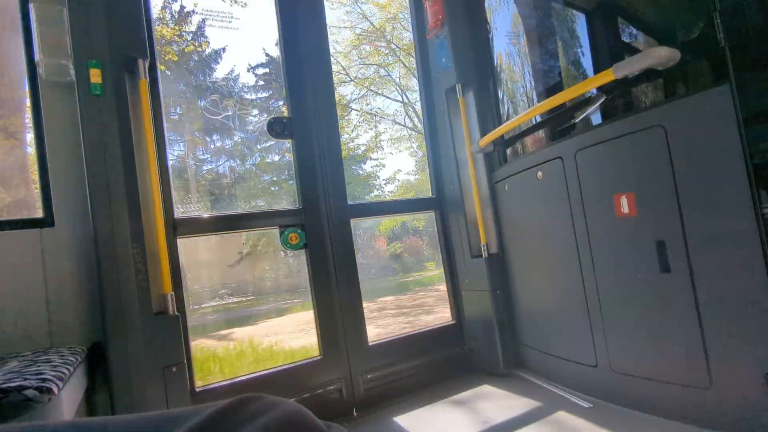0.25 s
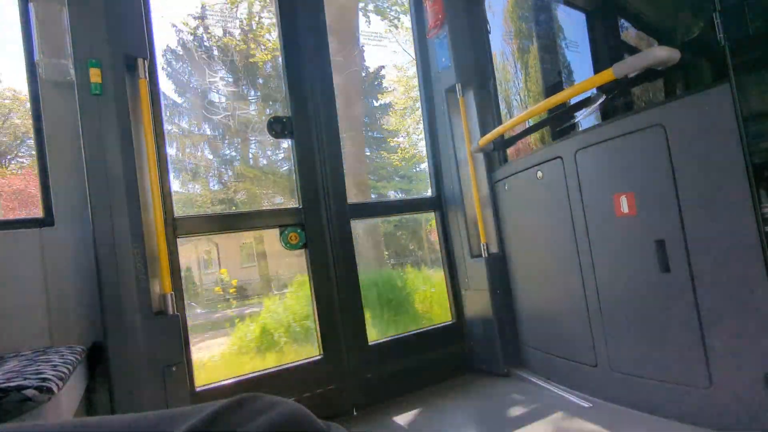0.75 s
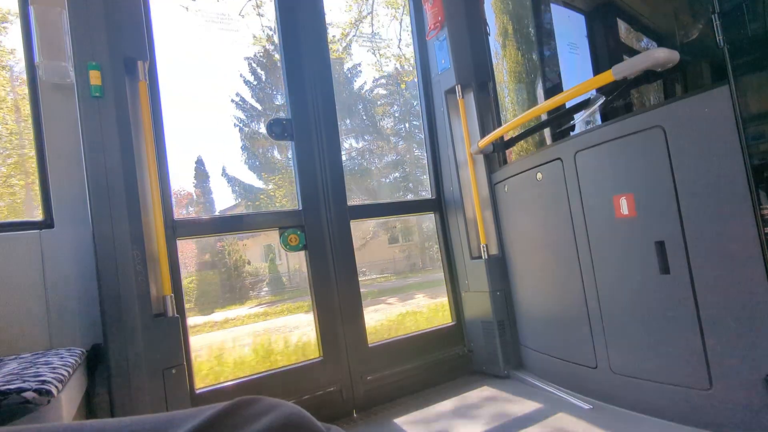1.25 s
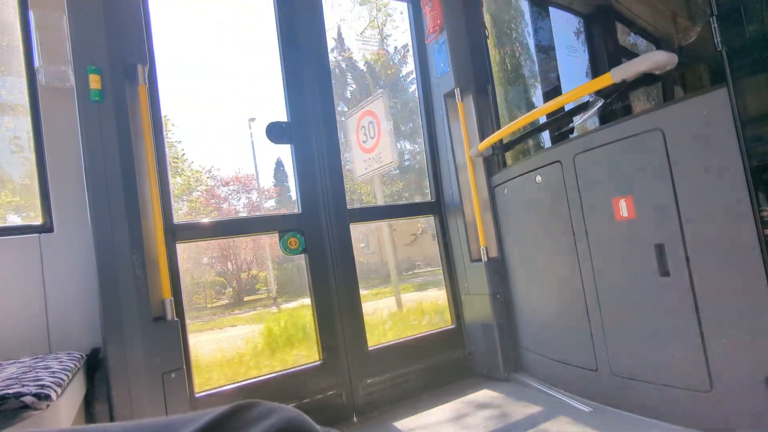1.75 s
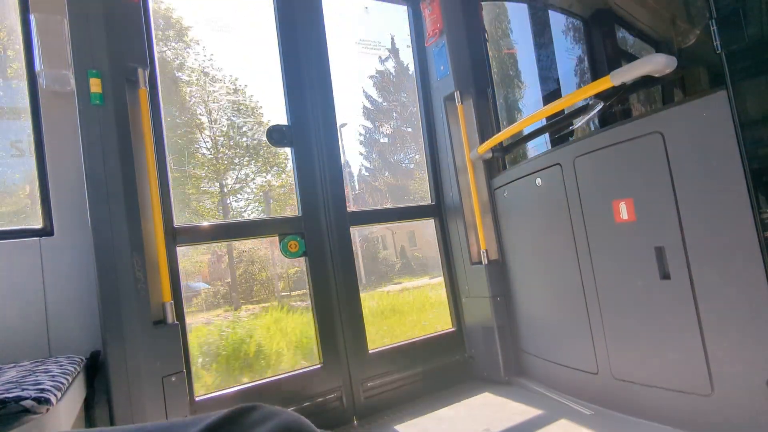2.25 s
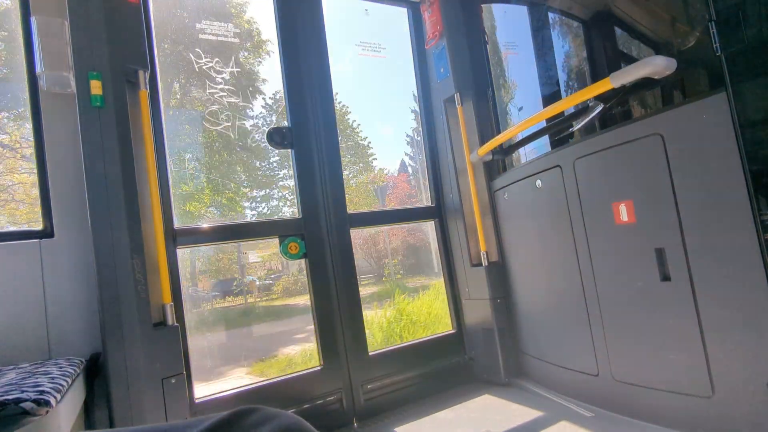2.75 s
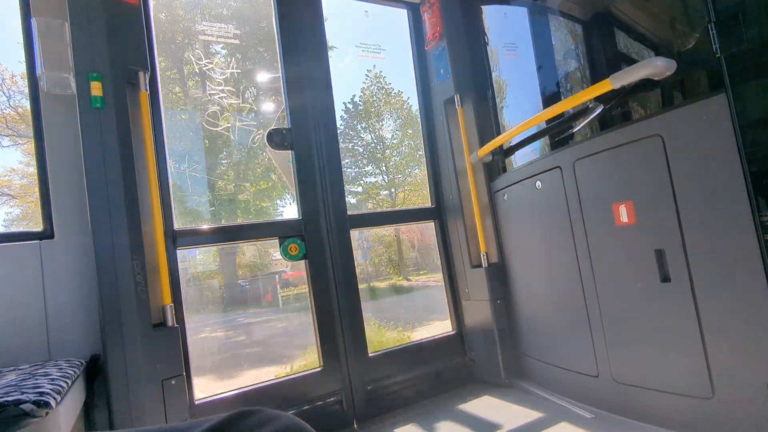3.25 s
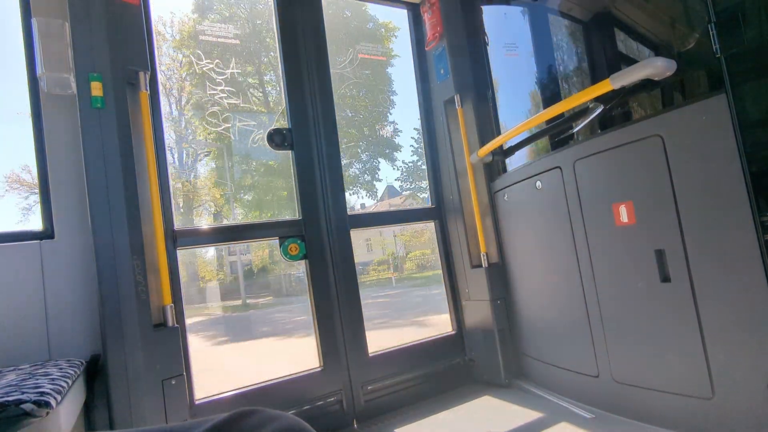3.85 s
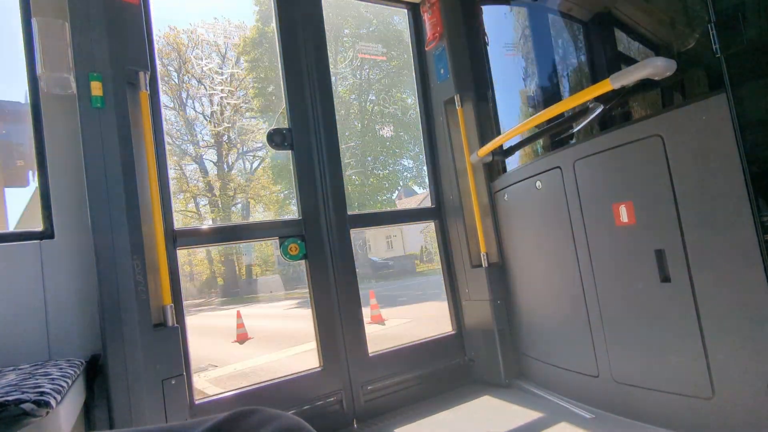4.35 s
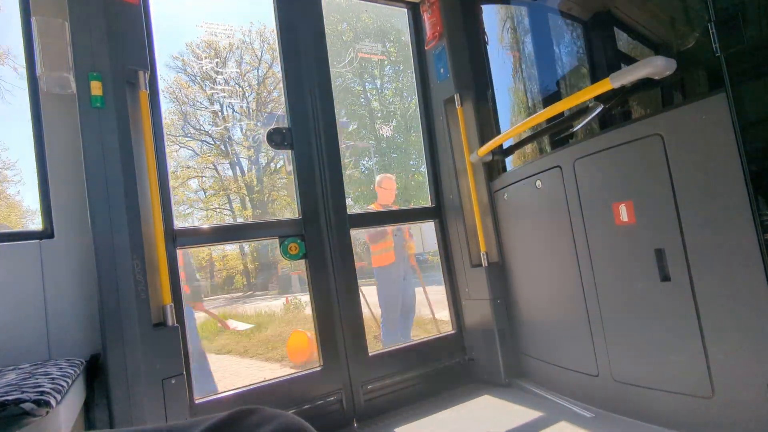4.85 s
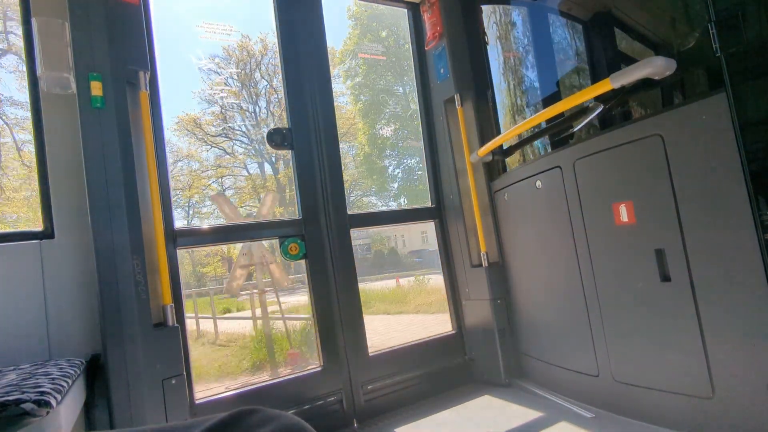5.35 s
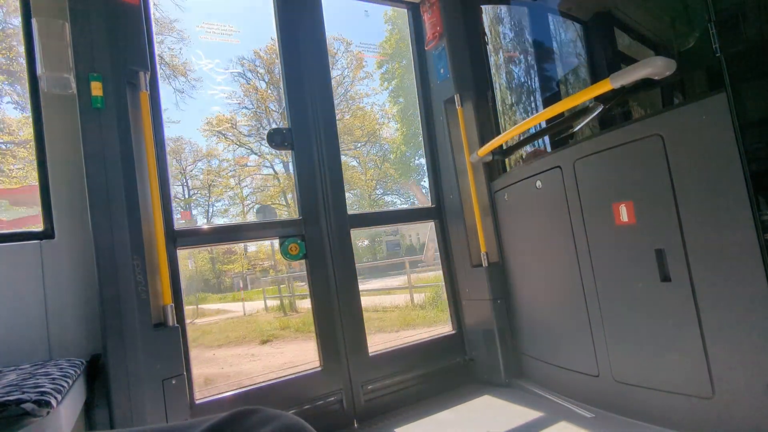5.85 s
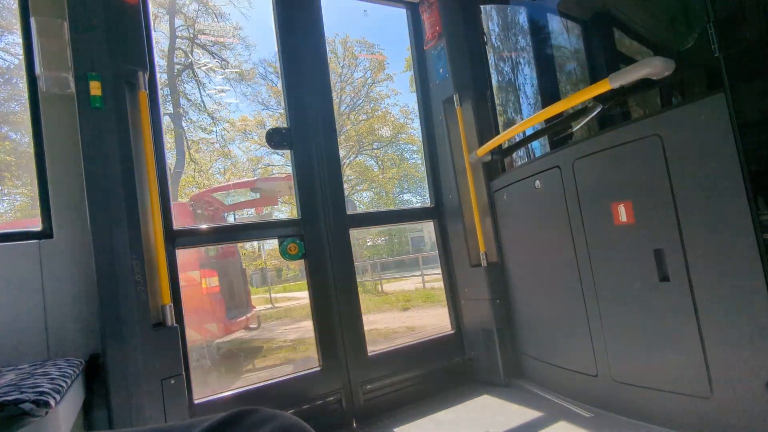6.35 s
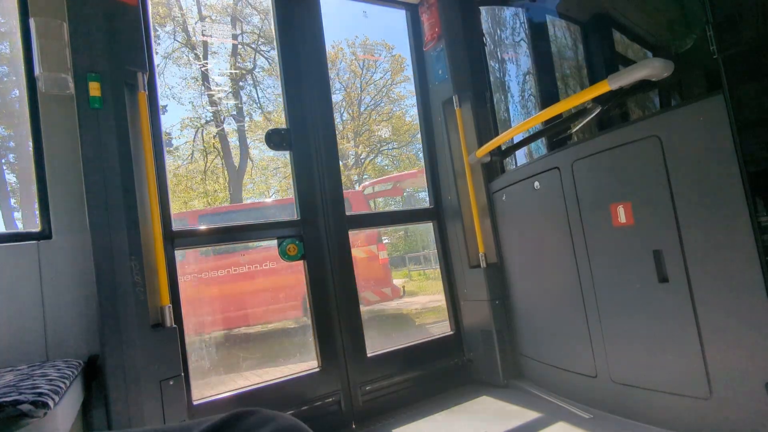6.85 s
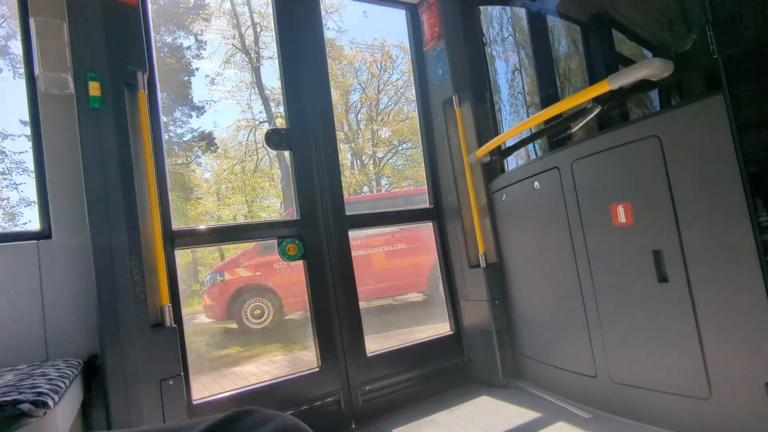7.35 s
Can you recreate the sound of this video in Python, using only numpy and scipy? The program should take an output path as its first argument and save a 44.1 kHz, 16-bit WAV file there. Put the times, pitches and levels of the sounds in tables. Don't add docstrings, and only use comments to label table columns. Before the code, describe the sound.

From a passenger seat near the doors of a braking tram, heard in close stereo. Quiet rolling, vent hiss and a faint steady gear whine open it. Then the wheels reach a hard crossing: deep floor thuds, panel bangs and sharp rattles of loose door fittings come irregularly. The roughness fades, leaving a gear whine sliding down in pitch, tiny brake squeaks and a few last thumps with a sharp knock.

```python
import sys
import numpy as np
from scipy import signal
from scipy.fft import rfft, irfft, next_fast_len
from scipy.io import wavfile
from scipy.ndimage import uniform_filter1d

SR = 44100
rng = np.random.default_rng(int(sys.argv[2]) if len(sys.argv) > 2 else 0)


def transcribe(signal):
    frames = np.atleast_2d(signal).T
    limited = np.clip(frames, -1, 1)
    pcm = np.round(limited * 32767).astype(np.int16)
    wavfile.write(sys.argv[1], SR, pcm)


def boost_factor(decibels):
    exponent = np.asarray(decibels, float) / 20
    return 10 ** exponent


N = 334719
TIME, SIZE = np.arange(N) / SR, next_fast_len(N + SR)
FREQ = np.arange(1, SIZE // 2 + 2) * SR / SIZE


def level(x, db):
    return x * boost_factor(db) / np.sqrt(np.mean(x ** 2))


def curves(table):
    s, *columns = np.transpose(table)
    return [np.interp(TIME, s, column) for column in columns]


def over_hz(table):
    hz, value = np.transpose(table)
    return np.interp(np.log(FREQ), np.log(hz), value)


def ring(x, modes, order=1):
    body = 0
    for k, (hz, width, db) in enumerate(modes):
        detuning = (FREQ / hz - hz / FREQ) * hz / width
        body = body + (-1) ** k * boost_factor(db) / (1 + 1j * detuning) ** order
    body = body / np.sqrt(np.mean(np.abs(body) ** 2))
    return irfft(rfft(x, SIZE) * body, SIZE)[..., :N]


# f/Hz, share [0-1]
LIKENESS = [(30, 0.9), (120, 0.98), (300, 0.94), (600, 0.56), (1200, 0.32), (4000, 0), (8000, 0.04),
            (15000, 0.2)]
# f/Hz, phase [radians]
LEFT_LEAD = [(30, 0.8), (100, -0.62), (300, -0.4), (520, -0.77), (700, 1.1), (1120, -4), (1640, -1),
             (2200, -7), (2930, 1.5), (4130, -4), (6200, -24.5), (15000, -18.5)]


def ports(common, own):
    share = np.clip(over_hz(LIKENESS), 0, 1)
    turn = np.exp(np.array([[.5j], [-.5j]]) * over_hz(LEFT_LEAD))
    shared_part = np.sqrt(share) * turn * rfft(common, SIZE)
    own_part = np.sqrt(1 - share) * rfft(own, SIZE)
    return irfft(shared_part + own_part, SIZE)[:, :N]


def noise(envelope=1):
    white = envelope * rng.standard_normal((3, N))
    return ports(white[0], white[1:])


def walk(rate_hz):
    hold = int(SR / rate_hz)
    steps = np.repeat(rng.standard_normal(N // 100), hold)[:N]
    return 1.04 * uniform_filter1d(uniform_filter1d(steps, hold), hold)


def bursts(times, peak_db, t60, rise_s):
    out, age = np.zeros(N + SR), np.arange(SR) / SR
    for s, db in zip(times, peak_db):
        start = int(s * SR)
        out[start:start + SR] += boost_factor(db - 60 * age / t60) * (1 - np.exp(-age / rise_s))
    return out[:N]


def tone(hz, db, wobble_db, apart=1., waver_hz=0.):
    phase = 2 * np.pi * np.cumsum(hz + waver_hz * walk(35)) / SR
    sides = []
    for side in (0, 1):
        loudness = boost_factor(db + wobble_db * (walk(14) + .6 * walk(45)))
        sides.append(np.sqrt(2) * loudness * np.sin(phase + side * apart))
    return np.array(sides)


def puff(s, length):
    return np.exp(-((TIME - s) / length) ** 2)


def swells(table, bluntness=2):
    total = 0
    for s, db, *span in table:
        length = np.where(TIME < s, span[0], span[-1])
        total = total + boost_factor(db) * np.exp(-np.abs((TIME - s) / length) ** bluntness)
    return total


def even(x, span_s, depth):
    span = int(span_s * SR)
    power = uniform_filter1d(uniform_filter1d(np.mean(x ** 2, axis=0), span), span)
    return level(x / power ** (depth / 2), 0)


# t/s, f/Hz
SPEED = [(0, 701), (1, 698), (2, 693.4), (2.6, 688), (3.2, 678.5), (3.7, 663), (4.1, 644), (4.8, 610.5),
         (5.3, 578), (5.75, 545), (5.95, 523), (6.15, 507), (6.35, 493), (6.7, 462), (7.05, 430),
         (7.59, 378)]
# t/s, level/dB
TRACK = [(0, -32), (.15, -28), (1.2, -29.5), (1.62, -31), (1.74, -27.5), (1.95, -21.5), (2.1, -18.5),
         (2.6, -17.5), (3.18, -16.5), (3.3, -13), (4.1, -16), (4.9, -15.5), (5.25, -18), (5.45, -22.5),
         (6.4, -23), (6.95, -25), (7.55, -27), (7.59, -33.5)]


def feel(rule):
    at_db, slope, slowing_db = rule
    mesh_hz = curves(SPEED)[0]
    rougher_db = curves(TRACK)[0] + 20
    return at_db + slope * rougher_db + slowing_db * np.log2(mesh_hz[0] / mesh_hz)


# t/s, floor thud level/dB, panel bang level/dB, rail ring level/dB
JOINTS = [(1.684, -19, -21, -64), (1.80, -20.5, -42, -64), (2.07, -15, -38, -49), (2.40, -16, -28, -53),
          (2.56, -18.5, -22.5, -38.5), (2.87, -23, -21, -38), (2.97, -13, -39, -46.5),
          (3.225, -9.5, -13, -35), (3.275, -13, -16, -33), (3.36, -29, -53, -30), (3.509, -21, -11.5, -31),
          (3.562, -8.5, -15.5, -37), (3.858, -8.5, -18, -31), (3.90, -33, -21, -38), (3.97, -15, -20, -46),
          (4.147, -11, -11.5, -26), (4.198, -14.5, -12, -40), (4.308, -14, -30, -50),
          (4.437, -13.5, -11.5, -32.5), (4.62, -21, -32, -61), (4.759, -18.5, -15, -37.5),
          (4.845, -6, -21, -39), (4.96, -27, -25, -52), (5.089, -34.5, -17, -49), (5.183, -20, -16.5, -51),
          (6.42, -23.5, -23, -39), (6.469, -20, -27, -42.5), (6.69, -27, -27.5, -47),
          (6.836, -23, -17, -53), (7.223, -19, -22.5, -54)]
# f/Hz, width/Hz, level/dB
BOOM = [(63.3, 22.5, -5.5), (86.1, 20, 1.5), (111.5, 12.9, -3.5), (138.5, 23.1, -3)]
PANELS = [(177.5, 14.4, -0.5), (219.5, 17, -3), (267.8, 19.4, -0.5), (322.2, 16.5, -4), (367.7, 22.6, -6),
          (477.6, 29.5, -7.5), (568.7, 35, -10), (645, 58, -12), (706.5, 88, -17)]
RAIL = [(870, 900, 4.5), (1419, 21, 9), (1564, 29, 5), (1860, 364, -1), (2017, 290, 0.5), (2900, 860, -25),
        (5800, 1000, -16.5)]
# level/dB at the reference, dB per dB of roughness, dB per halving of speed
BOOM_FEEL = (-20, 1.11, 5)
DRUM_FEEL = (-23.5, 0.99, -3.5)
RAIL_FEEL = (-43, 0.81, -16.5)


def wheels():
    patch = walk(30)
    boom = even(ring(noise(), BOOM, order=2), 0.1, 0.68)
    drum = even(ring(noise(boost_factor(2.0 * patch + 0.5 * walk(45))), PANELS), 0.035, 0.27)
    drum = signal.sosfilt(signal.butter(2, 1500, fs=SR, output="sos"), drum)
    rail = level(ring(noise(boost_factor(0.53 * patch + 0.41 * walk(60))), RAIL, order=2), -0.36)
    s, thud_db, bang_db, ring_db = np.transpose(JOINTS)
    thud = bursts(s, thud_db + 9.5, 0.28, 0.031)
    bang = bursts(s, bang_db + 5, 0.34, 0.017)
    clang = bursts(s + .025, ring_db + 3.5, 0.43, 0.029)
    thud, bang, clang = uniform_filter1d([thud, bang, clang], size=400)
    floor = boom * np.hypot(boost_factor(feel(BOOM_FEEL)), thud)
    walls = drum * np.hypot(boost_factor(feel(DRUM_FEEL)), bang)
    return floor + walls + rail * np.hypot(boost_factor(feel(RAIL_FEEL)), clang)


# f/Hz, level/dB per Hz
VENT = [(470, -39), (800, 1.5), (1510, -7), (2080, -11.5), (3100, -17.5), (4200, 2), (4900, -17),
        (5400, -14), (6500, -20.5), (7700, -34.5), (9260, -47), (11300, -50), (13100, -49), (15600, -43.5)]
# f/Hz, width/Hz, level/dB
NOZZLE = [(3850, 390, -3.5), (4127, 310, 0.5), (4450, 310, -4.5)]
# t/s, grille hiss level/dB, duct whistle level/dB
FLOW = [(0, -51.5, -56), (1.2, -56.5, -58), (2.2, -54, -67), (5, -50, -100.5), (7.59, -54.5, -84)]
# f/Hz, width/Hz, level/dB
SEALS = [(7700, 500, -2.5), (14500, 500, -6)]
SEALS_DB = (-76.5, 0.4, 10)


def vents():
    air = irfft(rfft(noise(boost_factor(.7 * walk(6))), SIZE) * boost_factor(over_hz(VENT)), SIZE)[:, :N]
    hiss_db, duct_db = curves(FLOW)
    hiss = level(ring(noise(boost_factor(1.2 * walk(40))), NOZZLE, order=2), 0) * boost_factor(hiss_db)
    duct = level(ring(noise(), [(2076, 200, 0)], order=2), 0) * boost_factor(duct_db)
    seals = level(ring(noise(boost_factor(2.5 * walk(9))), SEALS, order=2), 0) * boost_factor(feel(SEALS_DB))
    hum = level(ring(noise(), [(381.4, 17.8, 0)]), -41)
    flutter = level(ring(noise(), [(42.6, 34, 0)], order=2), -39.5)
    return level(air, -51.5) + seals + hiss + duct + hum + flutter


ORDERS_APART = [
    (1, .3),
    (2, 2.6),
    (4, .4),
    (7.33, 1.6),
]
QUIET_DB = [-55, -66, -82.5, -72]
# crest t/s, level/dB, half length/s
MESH_SWELLS = [(.1, -50, 0.12), (2.1, -49, 0.36), (2.45, -44, 0.24), (3.7, -46, 0.22), (5.32, -46.5, 0.16),
               (5.5, -37, 0.12), (5.72, -36, 0.12), (6.25, -31, 0.11), (6.5, -32, 0.13), (6.85, -32.5, 0.1),
               (7.3, -53, 0.36)]
OCTAVE_SWELLS = [(.9, -67, 0.24), (1.75, -50, 0.15), (2.7, -47.5, 0.17), (3.3, -46, 0.31),
                 (5.72, -50, 0.13), (6.25, -56, 0.12), (6.72, -57, 0.11), (7.05, -62, .2)]
FOURTH_SWELLS = [(1.8, -79, 0.24), (5.75, -75, .2), (6.1, -64.5, .12), (6.7, -68, 0.57), (7.3, -78, 0.1)]
SLOT_SWELLS = [(.2, -68, 0.19), (.55, -69, 0.12), (1.06, -61.5, 0.18), (1.32, -69, .1), (1.6, -68, 0.23),
               (2.0, -71.5, 0.13), (2.45, -63, 0.27), (2.75, -69, .1), (3.13, -61, .09), (3.88, -61, 0.07),
               (4.12, -63, .06), (4.7, -58, 0.33)]
# t/s, f/Hz, level/dB, length/s
SQUEAKS = [(5.76, 1500, -51, .04), (6.19, 1005, -50, .045), (6.72, 1085, -58, .07), (6.97, 1035, -59, .05),
           (7.1, 1110, -59, .06), (7.17, 1075, -59, .06), (7.54, 1525, -60, .04)]
# f/Hz, level/dB
CONVERTER = [(11977, -68), (11917, -80), (9780, -86)]


def drive():
    mesh_hz = curves(SPEED)[0]
    tables = MESH_SWELLS, OCTAVE_SWELLS, FOURTH_SWELLS, SLOT_SWELLS
    loud = [boost_factor(db) + swells(table) for db, table in zip(QUIET_DB, tables)]
    out = np.zeros((2, N))
    for (multiple, apart), gain in zip(ORDERS_APART, loud):
        out += tone(multiple * mesh_hz, 0, 3.6, apart, waver_hz=7) * gain
    out += tone(7.48 * mesh_hz, -19, 5) * loud[-1]
    for s, hz, db, length in SQUEAKS:
        out += tone(hz, db, 1.5) * puff(s, length)
    for hz, db in CONVERTER:
        out += tone(hz, db, 2.6, .9)
    return out


# f/Hz, width/Hz, level/dB
FITTINGS = [(2000, 270, 1.5), (3140, 1400, 0), (6220, 950, -2), (7440, 680, -5), (8770, 550, -3),
            (9780, 1400, -6), (12500, 4500, -12.5)]
# t/s, peak level/dB
KNOCKS = [(1.9679, -35), (2.0378, -48), (2.228, -39), (2.5196, -29.5), (2.8405, -37), (2.9412, -45),
          (2.9986, -27.5), (3.0296, -28), (3.1478, -28.5), (3.1787, -29.5), (3.211, -30), (3.313, -21),
          (3.5938, -40), (3.6267, -39.5), (3.726, -43), (3.8587, -36), (3.8961, -32), (3.9206, -35),
          (4.1889, -49), (4.5085, -36), (4.802, -34), (5.231, -44.5), (6.4682, -32), (6.513, -23.5),
          (6.5435, -43), (7.1257, -40)]
# crest t/s, level/dB, rise/s, fall/s
SHUDDERS = [(.1, -58.5, .06, .15), (1.98, -68, 0.018, 0.058), (2.24, -50.5, 0.032, .08),
            (2.58, -49.5, 0.046, 0.034), (2.85, -56, .04, .06), (3.04, -50, 0.036, 0.094),
            (3.22, -59, .05, .05), (3.35, -40.5, 0.081, 0.038), (3.40, -34, 0.052, 0.052),
            (3.63, -45.5, 0.088, 0.085), (3.74, -48, 0.044, 0.063), (3.95, -43.5, 0.069, 0.063),
            (4.24, -44.5, 0.072, 0.089), (4.53, -48, 0.047, 0.085), (4.84, -46, 0.039, 0.055),
            (4.95, -50.5, 0.06, 0.079), (5.24, -55, .03, 0.09), (6.545, -41, 0.048, 0.04),
            (7.13, -60.5, 0.025, .05)]
# level/dB at the reference, dB per dB of roughness, dB per halving of speed
SHAKE_FEEL = (-65, 0.62, 1)


def fittings():
    chance = rng.random((2, N))
    tap_db = np.minimum(-3. * np.log(1 - chance[1]), 9)
    taps = (chance[0] < 1100 / SR) * boost_factor(tap_db)
    tail = np.exp(-1 / (.0025 * SR))
    tapping = signal.lfilter([1], [1, -tail], taps)
    bounce = boost_factor(0.73 * np.sin(2 * np.pi * np.cumsum(31.5 + 2.0 * walk(1.6)) / SR))
    chatter = level(ring(noise(bounce * tapping + 2.1), FITTINGS), 1.5)
    s, peak_db = np.transpose(KNOCKS)
    knocks = ring(noise(bursts(s, peak_db - 9.0, 0.05, 0.0024)), FITTINGS)
    shake_power = swells(SHUDDERS, bluntness=1.3) ** 2 + boost_factor(feel(SHAKE_FEEL)) ** 2 - boost_factor(-67) ** 2
    shake = np.sqrt(np.clip(shake_power, 0, None))
    shake = uniform_filter1d(shake, size=300)
    linger = np.exp(-1 / (0.018 * SR))
    shake = signal.lfilter([1 - linger], [1, -linger], shake)
    clatter = chatter * shake + knocks
    dull = signal.sosfiltfilt(signal.butter(3, 10800, fs=SR, output="sos"), clatter)
    return dull + (clatter - dull) * np.clip(shake / boost_factor(-43), 0, 1) ** .5


# t/s, f/Hz, level/dB, half length/s
THUMPS = [(2.063, 148, -21, 0.1), (6.445, 81.9, -8.5, 0.02), (6.715, 85, -23, 0.022),
          (6.87, 89.3, -13, 0.029), (7.245, 85.6, -15.5, 0.021)]


def thumps():
    return sum(tone(hz, db, 1.7, apart=.25) * puff(s, length) for s, hz, db, length in THUMPS)


def scene():
    return wheels() + vents() + drive() + fittings() + thumps()


def top_cut(x):
    return signal.sosfilt(signal.butter(12, 15760, fs=SR, output="sos"), x)


# f/Hz, level/dB
LEFT_GAIN = [(30, -3), (150, 0.5), (300, 1), (700, -2), (1400, -1.1), (4000, -3), (8000, 0.5), (15000, 1.5)]


def record(dry):
    tilt = boost_factor(np.array([[.5], [-.5]]) * over_hz(LEFT_GAIN))
    bass_cut = 1 / (1 - 1j * 36 / FREQ) ** 2
    x = irfft(rfft(dry, SIZE) * tilt * bass_cut, SIZE)[:, :N]
    x = x / (1 + np.abs(x) ** 8) ** (1 / 8)
    return top_cut(x)


dry = scene()
out = record(dry)
transcribe(out)
```